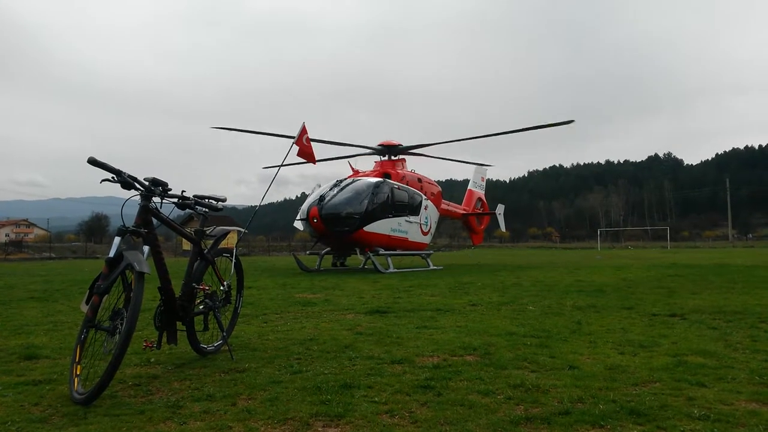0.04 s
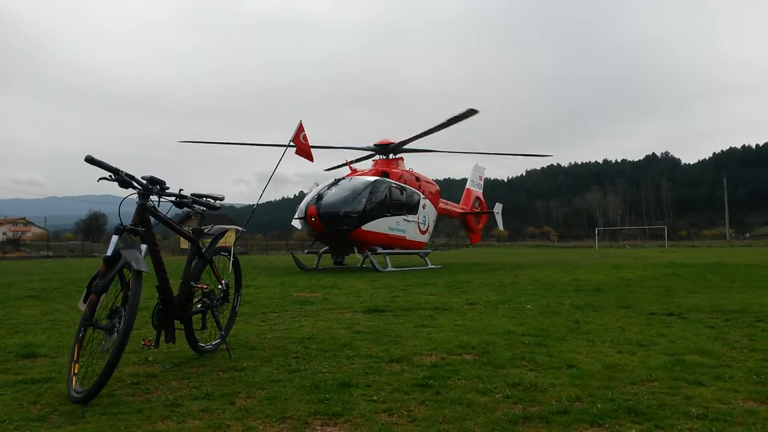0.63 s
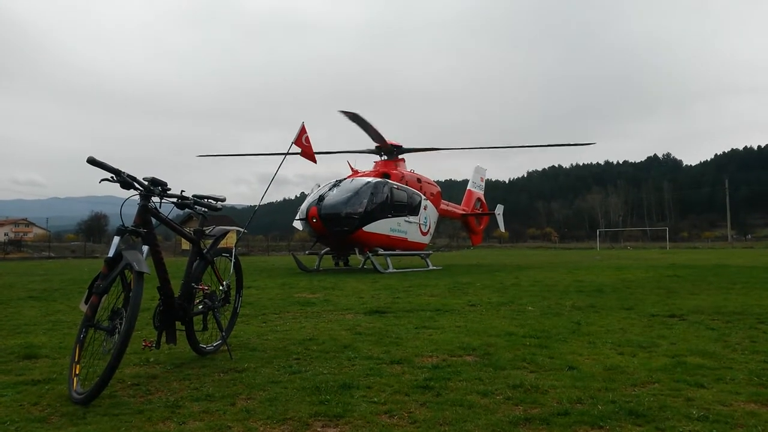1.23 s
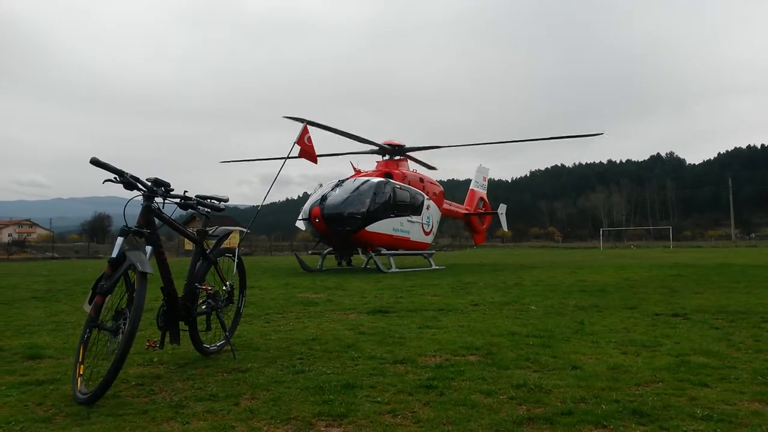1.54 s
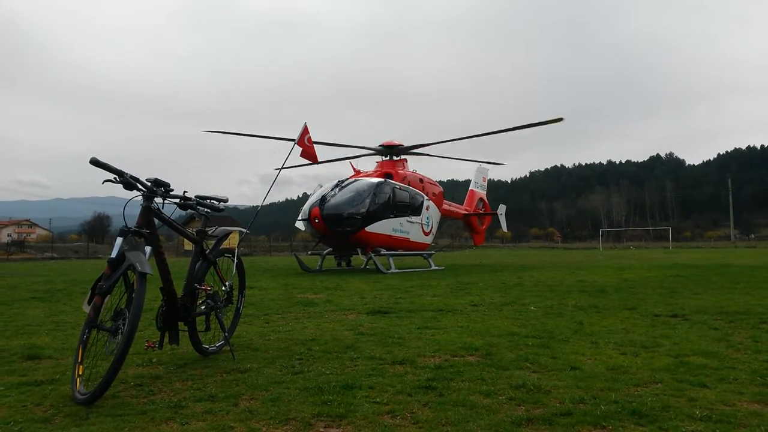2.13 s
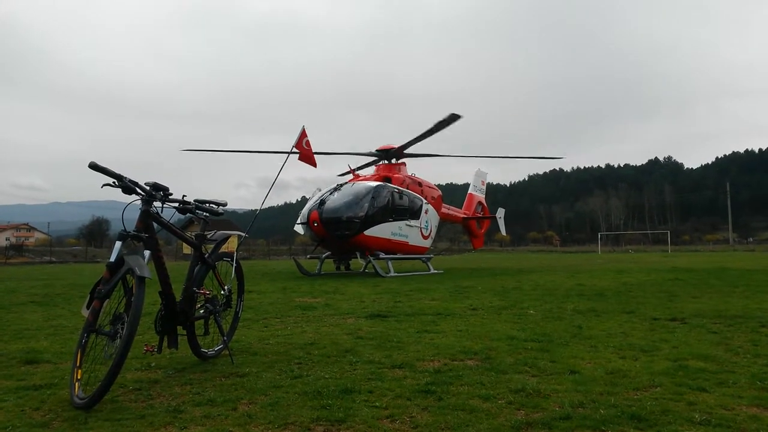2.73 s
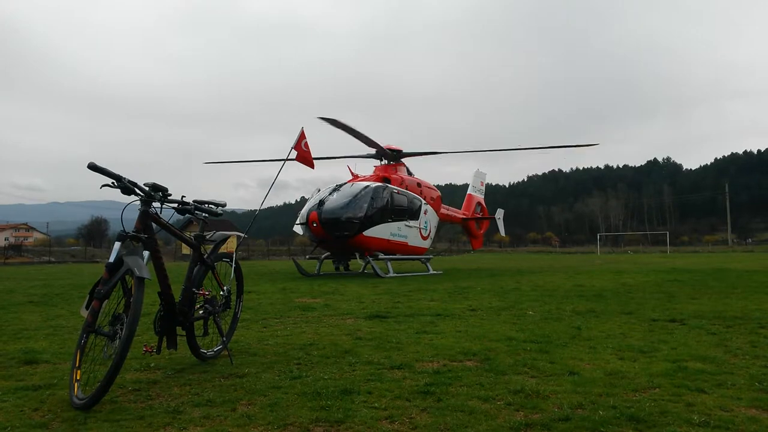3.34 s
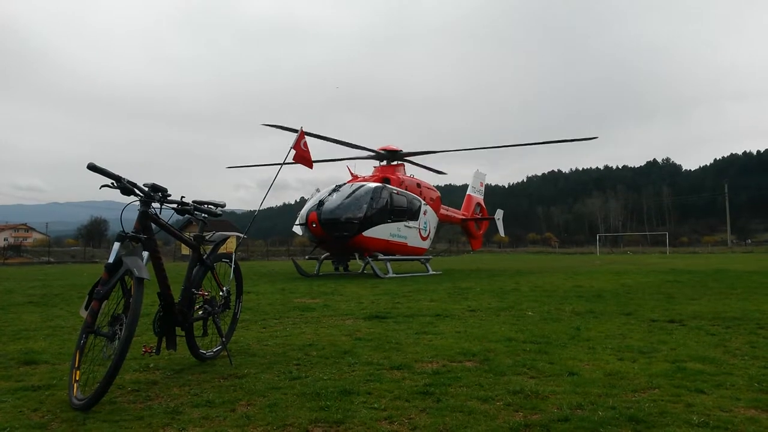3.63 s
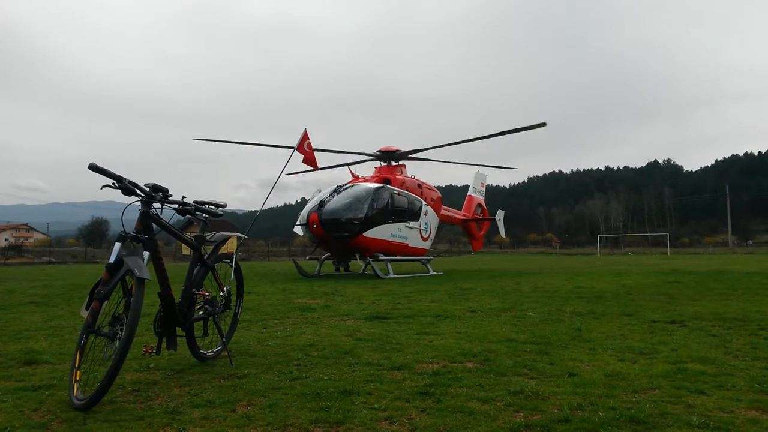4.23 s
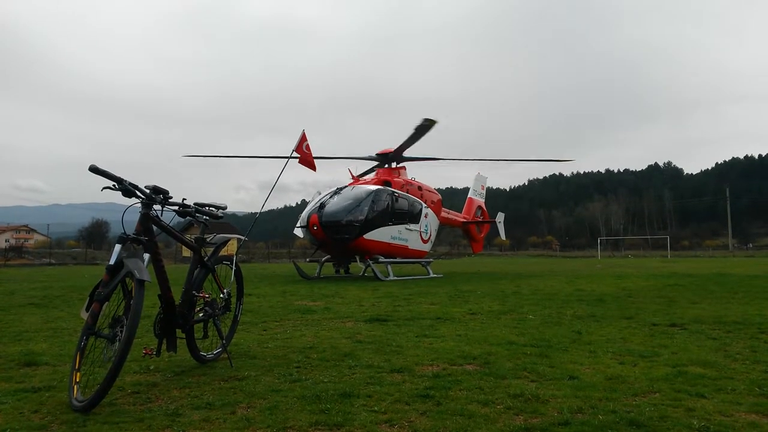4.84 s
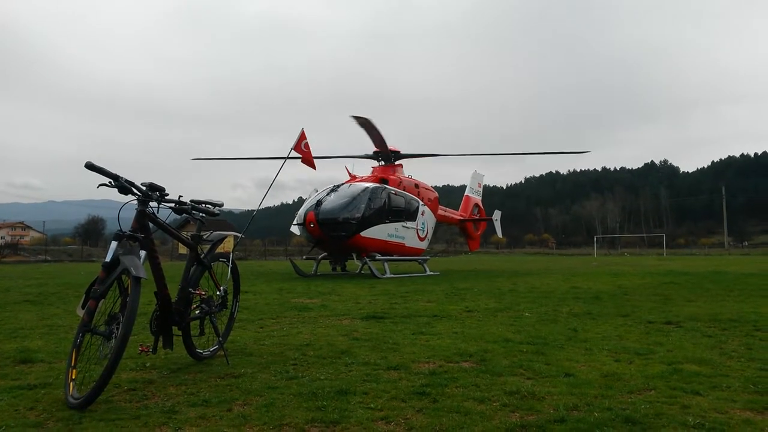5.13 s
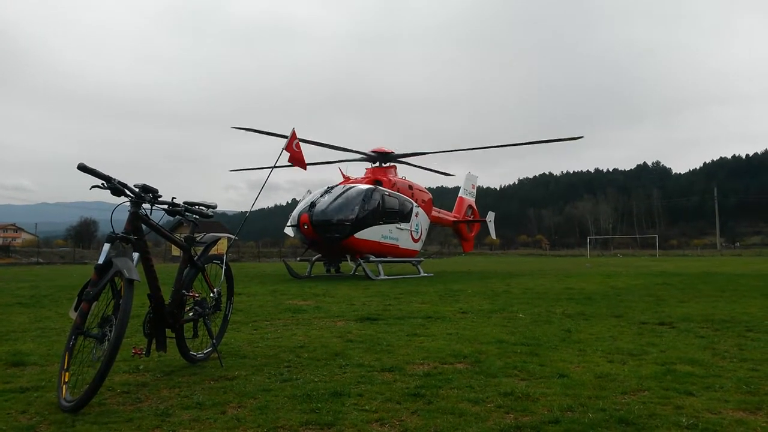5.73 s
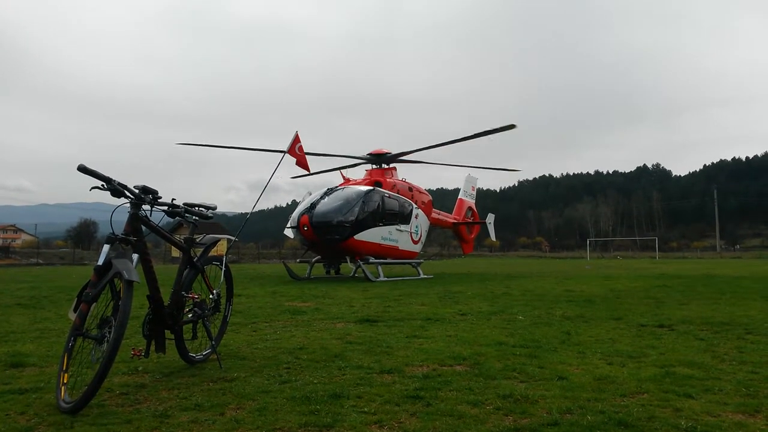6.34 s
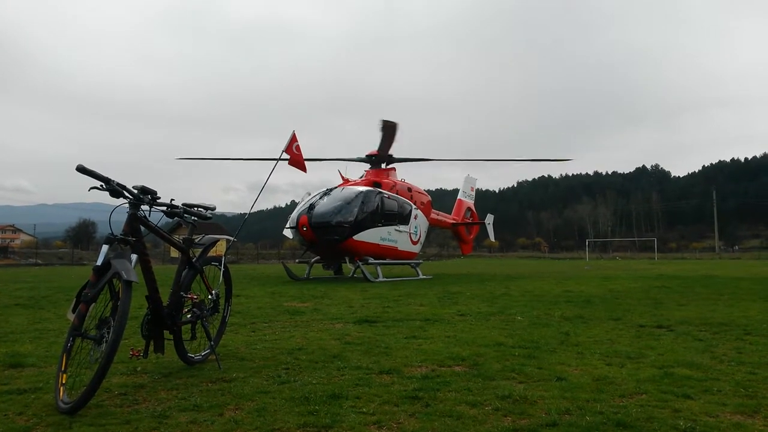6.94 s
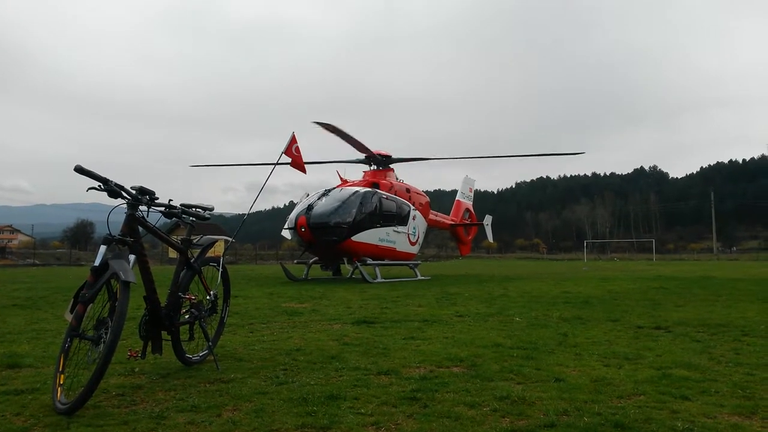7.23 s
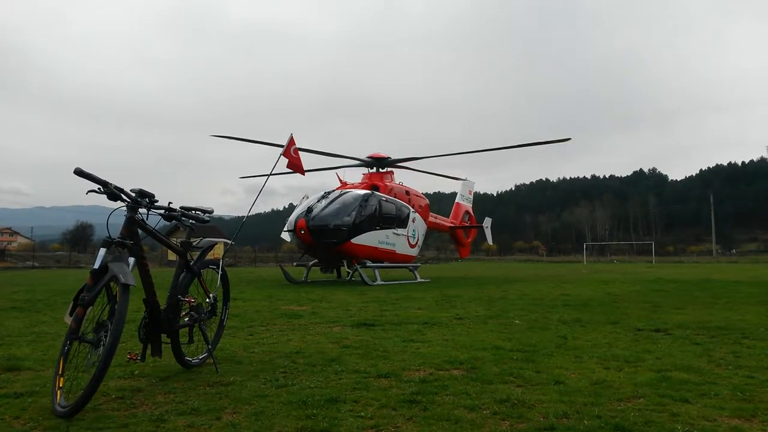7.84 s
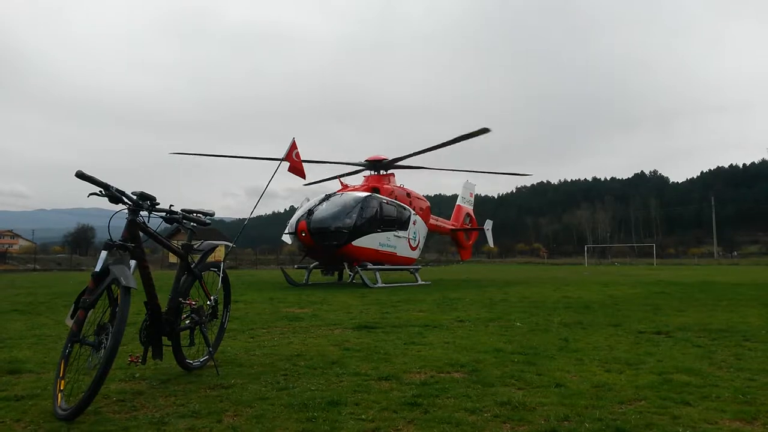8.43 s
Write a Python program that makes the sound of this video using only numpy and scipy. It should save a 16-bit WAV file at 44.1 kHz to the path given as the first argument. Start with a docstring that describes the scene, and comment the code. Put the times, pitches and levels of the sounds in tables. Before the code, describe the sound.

A helicopter idles on the ground, with a steady turbine whine and hiss over an exhaust roar and fast, low rotor throb.

```python
"""On a grass field, a light twin-turbine helicopter idles some way from a camera with two mic ports.
Its four blades beat the air into a low throb and flutter the roar of the exhausts and the hiss of the
compressors. Ducts hum, shafts and gears whine, and a light breeze buffets the ports.
The ground bounce hollows out the engine noise, and moving air makes it swell and ebb."""
import sys
import numpy as np
from scipy import signal
from scipy.fft import rfft, irfft, next_fast_len
from scipy.io import wavfile
from scipy.ndimage import uniform_filter1d, map_coordinates

SR = 44100
rng = np.random.default_rng(int(sys.argv[2]) if len(sys.argv) > 2 else 0)


def transcribe(u):
    """Save the signal u as a 16-bit wav file named by the first command-line argument.

    u: samples, shape (n,) or (channels, n), limited to [-1, 1]; the rate is SR.
    q: integer samples, one column per channel.
    """
    v = np.clip(np.atleast_2d(u).T, -1, 1)
    q = np.round(v * 32767).astype(np.int16)
    wavfile.write(sys.argv[1], SR, q)


N = 373527
TIME = np.arange(N) / SR
BLADE_HZ, FIRST_BLADE_S = 19.5, .0385


def amp(db):
    """Decibels to gain."""
    return 10 ** (np.asarray(db) / 20)


def unit(x):
    """Scale to rms 1."""
    return x / np.sqrt(np.mean(np.abs(x) ** 2) + 1e-20)


def along(points, hz):
    """Read each value column of a frequency table at hz, on a log axis."""
    points_hz, *columns = np.transpose(points)
    return np.array([np.interp(np.log(hz + 1), np.log(points_hz + 1), column) for column in columns])


def wobble(rate):
    """A smooth random curve with rate knots a second."""
    knots = rng.standard_normal(int(N * rate / SR) + 4)
    coarse_s = TIME[::32]
    return np.interp(TIME, coarse_s, map_coordinates(knots, [coarse_s * rate]))


def tone(hz, width_hz):
    """A sine of rms 1 whose pitch wanders over its width."""
    drift = 2 * np.pi * np.cumsum(width_hz / 2 * wobble(12)) / SR
    return np.sqrt(2) * np.sin(2 * np.pi * (hz * TIME + rng.random()) + drift)


def filtered(x, response):
    """Shape x with a gain given as a function of frequency."""
    size = next_fast_len(N + SR // 2)
    return irfft(rfft(x, size) * response(np.fft.rfftfreq(size, 1 / SR)), size)[..., :N]


def at_ports(pair, colour_db):
    """Colour a stereo pair and give the two ports their phase difference."""
    # Each row: frequency in Hz, phase lead of the left port in radians.
    lead = [(1250, .1), (1500, 1.5), (1680, 5.6), (2150, 8.8), (2450, 7.9), (3000, 14.8), (3500, 19.3),
            (5500, 18.3), (7500, 19)]
    return filtered(pair, lambda hz: amp(colour_db(hz)) * np.exp(.5j * along(lead, hz) * [[1], [-1]]))


def reflections(hz):
    """Gain in dB at each port, hollowed where reflections cancel the direct sound."""
    # Each row: centre in Hz, width in Hz, gain in dB.
    notches_left = [(977, 102, -6), (1530, 78, -9.5), (2250, 130, 0), (3450, 90, 1), (5450, 150, -3.5)]
    notches_right = [(992, 86, -12), (1556, 156, -12), (2164, 330, -7.5), (3690, 220, -7), (4285, 250, -15),
                     (4860, 280, -7.5), (5453, 200.0, -5.0), (7190, 150, -14.5)]
    return np.array([sum(db / (1 + (2 * (hz - centre) / width) ** 2) for centre, width, db in port)
                     for port in (notches_left, notches_right)])


def scattered(x, echo_db, count=10):
    """Weak echoes off fuselage and ground put a fine ripple on the spectrum."""
    delays_s = rng.uniform(.002, .009, (count, 2, 1))  # one for each echo and port
    ripple = lambda hz: 1 + amp(echo_db) * sum(np.cos(2 * np.pi * hz * delay) for delay in delays_s)
    return filtered(x, ripple)


def rush(spectrum, patchy_db):
    """Turbulence noise at both ports, with drifting louder and softer patches."""
    # Each row: frequency in Hz, left-right likeness (0 to 1) outside the notches.
    alike = [(20, .88), (60, 0.98), (200, 1), (420, 0.87), (1250, 0.95), (1850, 0.85), (2600, 0.48),
             (3500, 0.63), (5900, 0.67), (8000, 0.16), (11000, 0.033)]
    noise_bins = signal.stft(rng.standard_normal((2, N)), nperseg=512)[2]
    patches = rng.standard_normal(noise_bins.shape[1:])
    patches = uniform_filter1d(patches, size=14, axis=0)  # smooth across frequency
    patches = uniform_filter1d(patches, size=26, axis=1)  # and across time
    pair = unit(signal.istft(noise_bins * amp(patchy_db * unit(patches)), nperseg=512)[1][:, :N])
    # Where the direct sound cancels, only scattered sound is left, so the image widens.
    likeness = lambda hz: np.clip(along(alike, hz) * amp(0.51 * reflections(hz).sum(0)), 0, 1)
    mid, side = filtered(pair, lambda hz: np.sqrt((1 + likeness(hz) * [[1], [-1]]) / 2))
    ports = np.array([mid + side, mid - side]) * np.sqrt(SR / 2)  # 0 dB per Hz
    return at_ports(ports, lambda hz: along(spectrum, hz) + reflections(hz))


def blade_pulse(sharpness):
    """A bump at each blade passage, uneven in height and centred on zero."""
    bump = np.exp(sharpness * (np.cos(2 * np.pi * BLADE_HZ * (TIME - FIRST_BLADE_S)) - 1))
    bump *= 1 + .18 * wobble(16)
    return bump - bump.mean()


def breeze():
    """Light gusts stir separate eddies at each port: a faint, low buffeting."""
    # Each row: frequency in Hz, level between swells and lulls in dB per Hz.
    buffet = [(15, -80), (35, -81), (70, -81), (150, -85), (300, -110)]
    eddies = rng.standard_normal((2, N)) * np.sqrt(SR / 2)  # 0 dB per Hz
    return filtered(eddies, lambda hz: amp(along(buffet, hz))) * amp(2.5 * wobble(3))


def duct_hum(swell_db):
    """The exhaust ducts hum on wandering low tones, the same at both ports."""
    # Each row: pitch in Hz, width in Hz, base level in dB.
    duct_tones = [(248.6, 4.87, -40.5), (273.8, 6.33, -40)]
    return sum(amp(db + swell_db + 1.4 * wobble(4)) * tone(hz, width_hz)
               for hz, width_hz, db in duct_tones)


def gear_whine():
    """Shafts, gears and fans sing, blurred and faded by the air on the way."""
    # Each row: pitch in Hz, width in Hz, left and right base level in dB.
    gear_tones = [(441, 3, -49, -54), (530, 5, -55, -59), (617, 8, -54, -55), (1413, 14, -60, -51),
                  (1620, 12, -51, -66), (1673.3, 1.5, -45.5, -49.5), (1692, 2, -56, -56),
                  (1962, 10, -56, -50), (2031, 1.5, -45, -39), (2495, 20, -59, -51), (3347, 4, -47, -48),
                  (3570, 25, -45, -51), (3688, 9, -42, -60), (4062, 3, -40.5, -44), (4660, 16, -39, -55),
                  (10020, 60, -55, -53)]
    whine = np.zeros((2, N))
    for hz, width_hz, left_db, right_db in gear_tones:
        fade_db = 2.1 * wobble(2.98) + 0.97 * wobble(17)
        whine += amp(fade_db + [[left_db], [right_db]]) * tone(hz, width_hz)
    return at_ports(whine, colour_db=lambda hz: -.8)


def compressor_hiss():
    """The intakes hiss; each blade adds a short swish and eddies make the level shimmer."""
    # Each row: frequency in Hz, left and right base level in dB per Hz.
    hiss_spectrum = [(2880, -92, -92), (3340, -58, -59), (3605, -53, -54.5), (4100.0, -50, -52.5),
                     (4620, -49, -49), (5250.0, -44, -56), (5840, -49, -55), (6300, -54.5, -57.5),
                     (7170, -55, -48.5), (7640, -64.5, -51.5), (8020, -61, -58), (9470, -66, -62),
                     (10870, -67.5, -65), (12000, -72.5, -71.5), (15000, -79.5, -80)]
    # The hiss's slow swell. Each row: time in seconds, gain in dB.
    hiss_swell = [(0.0, 0), (1.2, -0.8), (1.59, 0.64), (3.79, -0.45), (4.38, -0.5), (4.58, 0.6), (6.58, 0),
                  (6.98, 0.5), (8.47, -0.35)]
    swell_db = np.interp(TIME, *np.transpose(hiss_swell))
    flutter_db = 1.22 * blade_pulse(sharpness=3.3) + 0.19 * wobble(30)
    hiss = scattered(rush(hiss_spectrum, patchy_db=0.53), echo_db=-29.5)
    return hiss * amp(swell_db - 0.04 + flutter_db)


def exhaust_roar(rise_db_per_s=0.18, waver_db=0.58):
    """The hot jets roar, slowly building, wavering in moving air and lightly chopped by the blades."""
    # Each row: frequency in Hz, left and right base level in dB per Hz.
    roar_spectrum = [(200, -90, -89), (340, -66, -61.5), (423, -60, -63), (616, -60, -60),
                     (850.0, -62.5, -61.5), (1190, -57, -56.5), (1420.0, -60, -54), (1740, -60, -58),
                     (2000.0, -63.5, -54.5), (2510, -65, -56.5), (2870, -60.5, -63.5), (3235, -58.5, -56.5),
                     (3410, -69, -73), (4000, -120, -120)]
    swell_db = rise_db_per_s * (TIME - TIME.mean()) + waver_db * wobble(2.95)
    roar = rush(roar_spectrum, patchy_db=0.6)
    chop_db = 0.84 * blade_pulse(sharpness=0.77)
    return roar * amp(swell_db - 0.38 + chop_db)


def rotor(swell_db, harmonics=17):
    """The blades throb, each harmonic wavering in the gusty inflow, over the pulsing downwash."""
    # Each row: frequency in Hz, base level of a harmonic there in dB.
    throb_spectrum = [(20, -76), (39, -62), (58, -53), (78, -48), (117, -44), (175, -44), (250, -49),
                      (330, -51.5)]
    # Turbulent air under the rotor. Each row: frequency in Hz, base level in dB per Hz.
    wash_spectrum = [(15, -84), (48, -73), (66, -62.5), (86, -57.5), (145, -54.5), (200, -50.5),
                     (250, -50.5), (290, -50.5), (340, -54.5), (395, -67), (520, -91)]
    throb = np.zeros(N)
    for hz in BLADE_HZ * np.arange(1, harmonics + 1):
        phase = 2 * np.pi * (hz * TIME + rng.random()) + 0.63 * wobble(4)
        level_db = along(throb_spectrum, hz) + 1.9 * wobble(3)
        throb += amp(level_db) * np.sqrt(2) * np.sin(phase)
    wash = rush(wash_spectrum, patchy_db=0.0) * amp(0.56 * blade_pulse(sharpness=1.5))
    return amp(swell_db) * (amp(-0.5) * throb + wash)


def scene():
    """Breeze, engines and rotor across open grass; rotor and duct hum swell and ebb together."""
    # The low rumble in moving air. Each row: time in seconds, gain in dB.
    rumble_swell = [(0.0, 0), (1.2, 0), (1.4, -3), (1.79, -0.5), (2.79, -1), (3.39, 1.5), (3.59, 0.8),
                    (5.78, 0.8), (6.38, -2), (6.58, 0.8), (7.57, -2.5), (8.37, 2.2), (8.47, -1.5)]
    rumble_db = np.interp(TIME, *np.transpose(rumble_swell))
    engines = duct_hum(rumble_db) + gear_whine() + compressor_hiss() + exhaust_roar()
    return breeze() + engines + rotor(rumble_db)


def record(dry):
    """The loudest peaks are softly rounded off and the highest treble is cut."""
    ceiling, top_hz = .93, 14550
    rounded = dry / (1 + np.abs(dry / ceiling) ** 12) ** (1 / 12)
    return filtered(rounded, lambda hz: hz < top_hz)


dry = scene()
out = record(dry)
transcribe(out)
```